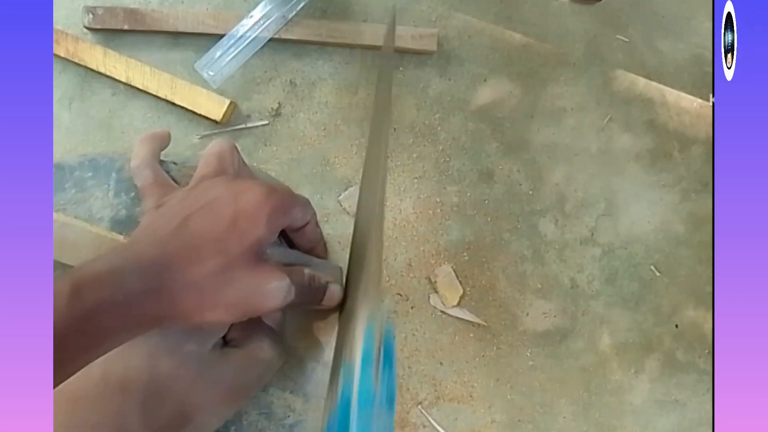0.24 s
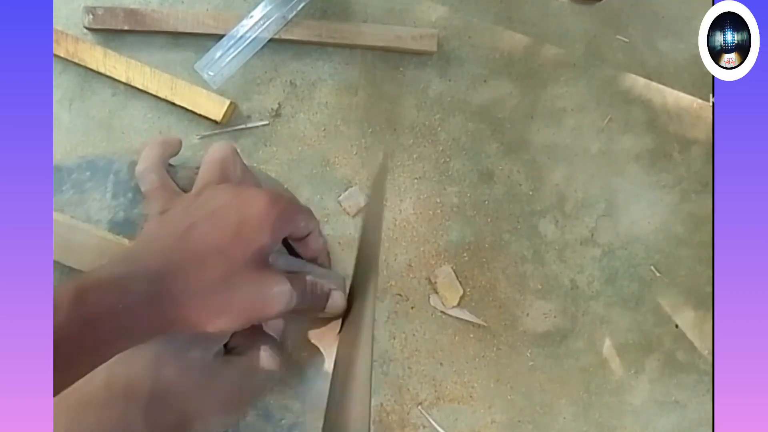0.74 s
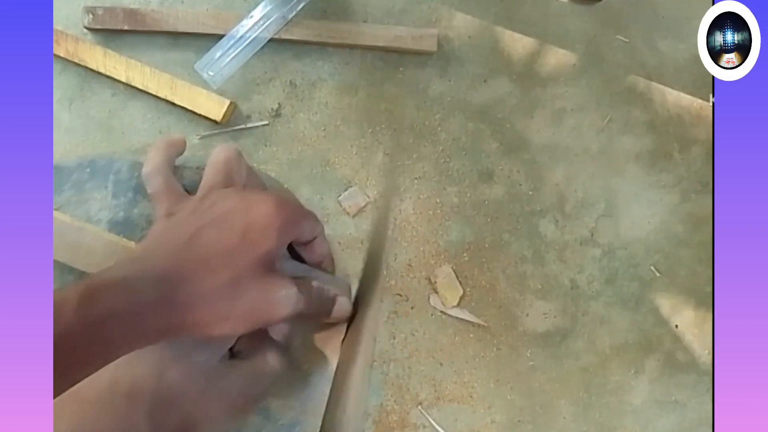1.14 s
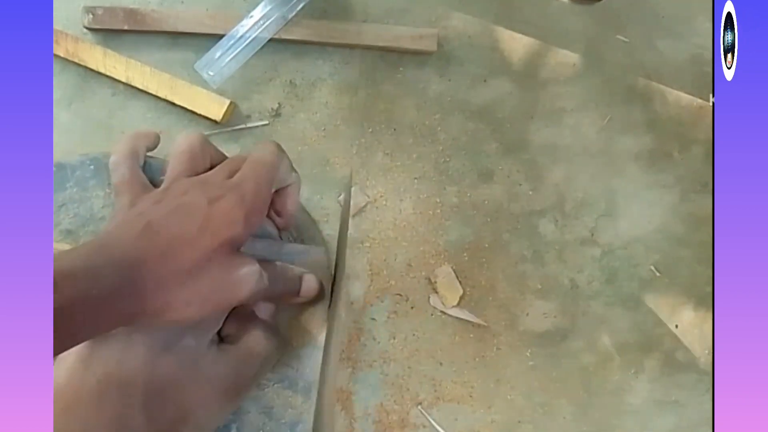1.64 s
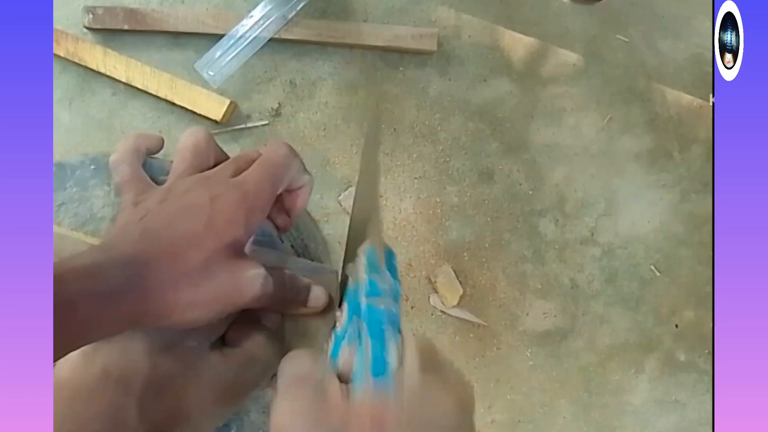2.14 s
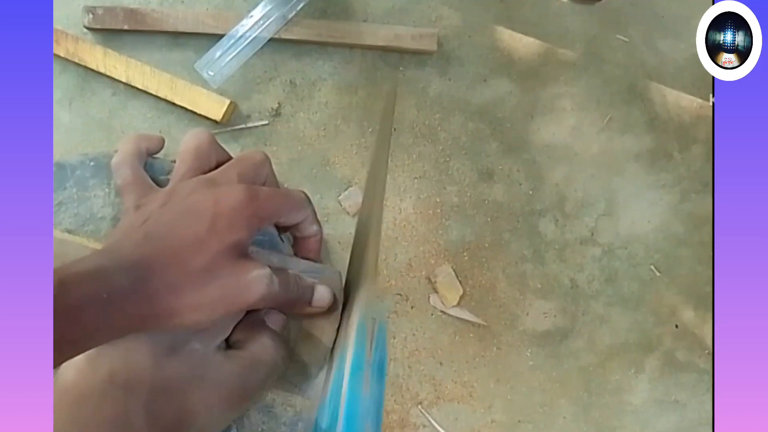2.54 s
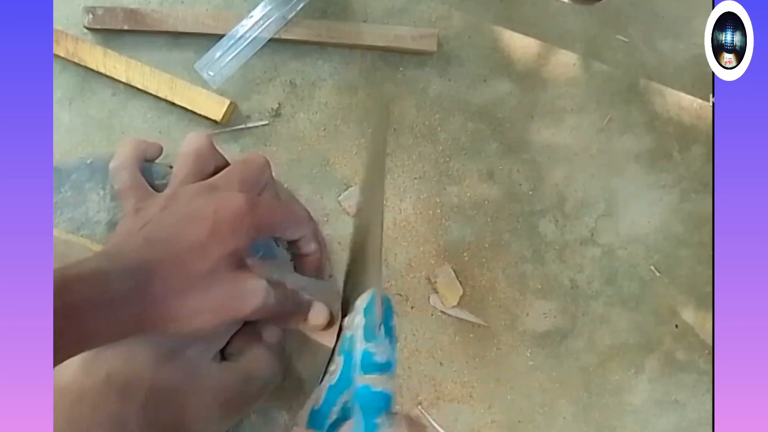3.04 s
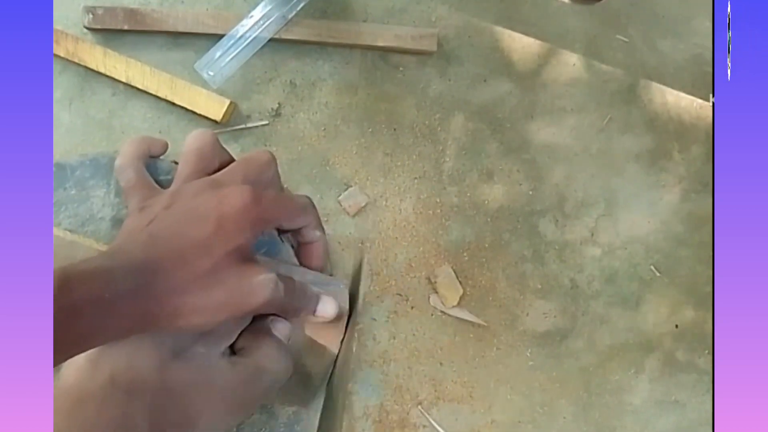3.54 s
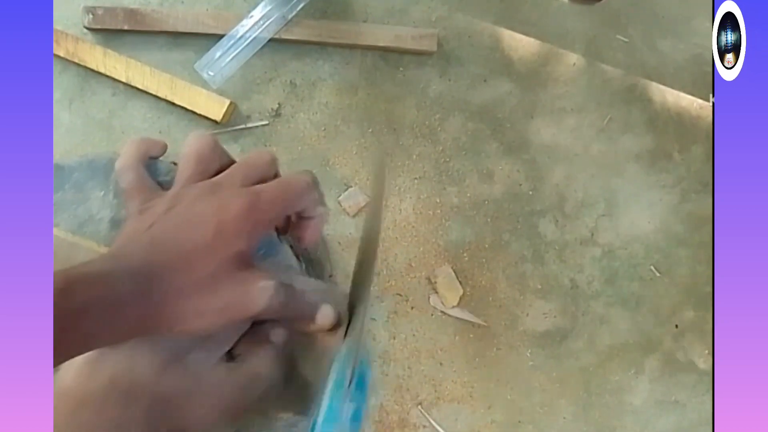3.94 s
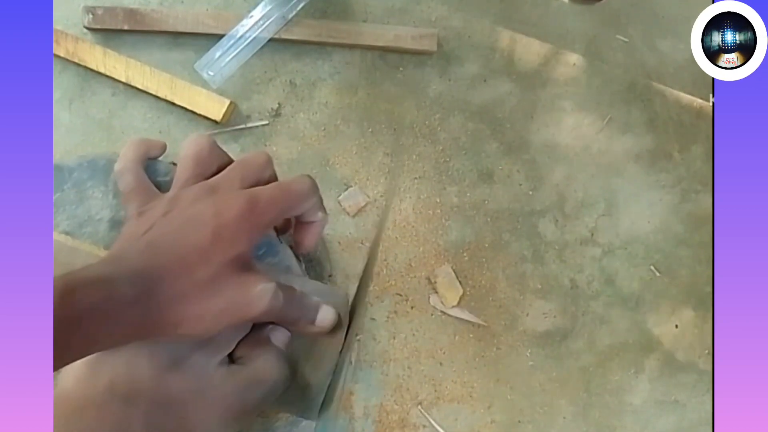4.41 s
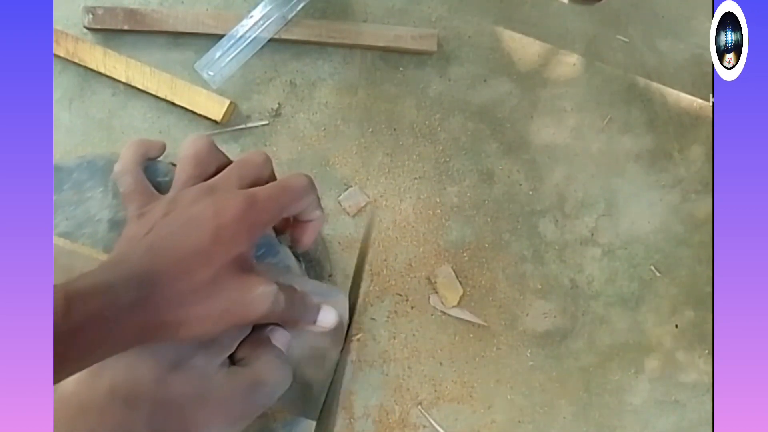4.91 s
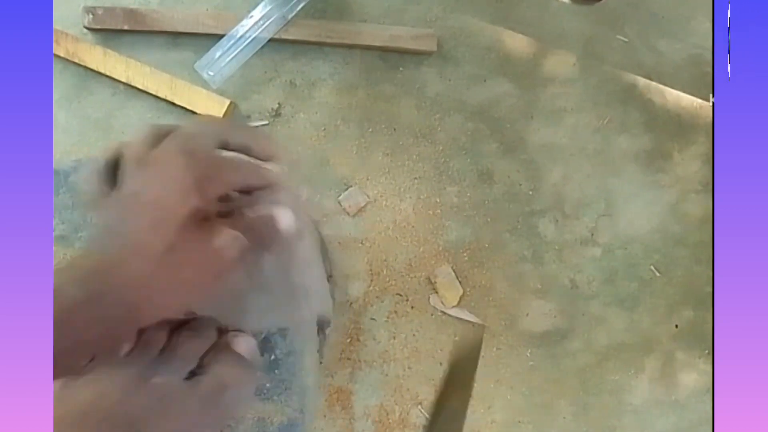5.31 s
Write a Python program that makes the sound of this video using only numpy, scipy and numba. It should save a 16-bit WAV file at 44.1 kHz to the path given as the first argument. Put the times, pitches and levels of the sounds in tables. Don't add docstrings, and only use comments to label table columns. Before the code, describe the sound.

Fast, dry sawing of light wood: short gritty rasps with a nasal metallic ring and bright dusty hiss, about five push-pull cycles each second. There is one short gap near the start, then a long run. Small hollow thuds come from the slat against the floor. At the end the loose blade rustles and tinkles faintly, followed by a soft bump, heard close on a phone with pumping background noise.

```python
import sys
import numpy as np
from scipy import signal
from scipy.fft import rfft, irfft
from scipy.io import wavfile
from numba import njit

SR = 44100
rng = np.random.default_rng(int(sys.argv[2]) if len(sys.argv) > 2 else 0)


def field_ratio(decibels):
    return 10 ** (np.asarray(decibels, dtype=float) / 20)


def store_pcm(level_fs):
    pcm = np.round(np.clip(level_fs, -1, 1) * 32767).astype(np.int16)
    wavfile.write(sys.argv[1], SR, np.atleast_2d(pcm).T)


N = 245637

# (time [s], level pulling [dB], level pushing [dB], kerf ring pulling [Hz])
BLADE_SHARE = [(0, -20.5, -8, 2770), (1.302, -31, -4.5, 2850), (1.499, -35, -5.5, 2490),
               (2.299, -21, -3.5, 2580), (2.9, -16, -2, 2570), (3.1, -15, -11.5, 2600),
               (4.1, -10, -15, 2620), (4.4, -33, -3, 2800), (4.75, -16, -16.5, 2680)]


def unit(x):
    return x / np.sqrt(np.mean(x ** 2) + 1e-20)


def curve(s, values):
    return np.interp(np.arange(N) / SR, s, values)


def wander(hz):
    r = np.exp(-2 * np.pi * hz / SR)
    noise = rng.standard_normal(N + 4000)
    return unit(signal.lfilter([1], [1, -2 * r, r * r], noise)[4000:])


def coloured(x, points):
    hz, db = np.transpose(points)
    grid = np.maximum(np.fft.rfftfreq(N, 1 / SR), 1)
    gain = field_ratio(np.interp(np.log(grid), np.log(hz), db))
    return unit(irfft(rfft(x) * gain, N))


def highpass(x, hz):
    return signal.sosfilt(signal.butter(4, hz, "high", fs=SR, output="sos"), x)


@njit
def resonate(x, cos_w, r):
    y = np.zeros(len(x))
    for i in range(2, len(x)):
        drive = (1 - r * r) / 2 * (x[i] - x[i - 2])
        y[i] = drive + 2 * r * cos_w[i] * y[i - 1] - r * r * y[i - 2]
    return y


def peak(x, hz, width_hz):
    return resonate(x, np.cos(2 * np.pi * hz / SR) + np.zeros(N), np.exp(-np.pi * width_hz / SR))


def body(x, modes, patchy_db, patch_hz, bend=1):
    feeds = [field_ratio(db + patchy_db * wander(patch_hz)) for hz, width, db in modes]
    power = sum(feed ** 2 * width * np.pi / SR for feed, (hz, width, db) in zip(feeds, modes))
    total = np.sqrt(power)
    out = np.zeros(N)
    for k, (hz, width, db) in enumerate(modes):
        out += (-1) ** k * peak(feeds[k] / total * x, hz * bend, width)
    return out


def struck(rows, rise_s):
    out = np.zeros(N)
    for s, db, hz, t60 in rows:
        start = int(s * SR)
        t = np.arange(min(int(t60 * SR), N - start)) / SR
        onset = (1 - np.exp(-t / rise_s)) ** 2
        out[start:][:len(t)] += field_ratio(db - 60 * t / t60) * onset * np.sin(2 * np.pi * hz * t)
    return out


def strokes():
    # (start [s], length [s], level [dB], growth over the stroke [dB], run-up [s])
    pull_rows = [(0.005, 0.064, -34.5, -5, 0.006), (0.194, 0.059, -31.5, -4, 0.015),
                 (0.385, 0.069, -40, 1, 0.012), (0.594, 0.069, -35, 4, 0.017),
                 (0.8, 0.061, -34, 5.6, 0.011), (1.272, 0.049, -28.5, 0.5, 0.029),
                 (1.463, 0.061, -35.5, 2.5, 0.0087), (1.669, 0.088, -42, -1.5, 0.022),
                 (1.885, 0.075, -32, 9.5, 0.014), (2.093, 0.078, -39.5, 1.2, 0.017),
                 (2.312, 0.086, -40, 0, 0.0055), (2.532, 0.096, -32, 1.5, 0.006),
                 (2.751, 0.075, -39, 3, 0.0034), (2.965, 0.075, -39.5, 4, 0.003),
                 (3.185, 0.07, -32.5, 3.5, 0.033), (3.397, 0.078, -40.5, -0.5, 0.007),
                 (3.621, 0.089, -33, 4, 0.0022), (3.851, 0.095, -39, -4, 0.003),
                 (4.08, 0.08, -42, -2.5, 0.0019), (4.277, 0.074, -41, 8.5, 0.016),
                 (4.499, 0.062, -34.5, -1.3, 0.031), (4.684, 0.051, -35, -8.5, 0.027)]
    # (start [s], length [s], level [dB], growth over the stroke [dB], kerf ring [Hz])
    push_rows = [(0.09, 0.058, -26.5, 2, 2800), (0.282, 0.052, -27, -3, 2810),
                 (0.493, 0.045, -28.5, -3.7, 2850.0), (0.687, 0.054, -24.5, 7.5, 2900),
                 (0.9, 0.053, -27.5, 0.5, 2780), (1.351, 0.053, -24.5, 0.3, 2890),
                 (1.559, 0.059, -27.5, -1.8, 2845), (1.789, 0.048, -28.5, 0, 2840),
                 (1.986, 0.058, -26, 0.5, 2880), (2.199, 0.053, -27.5, 3.5, 2940),
                 (2.423, 0.046, -26.5, 1.8, 2830), (2.637, 0.054, -28, -1, 2875),
                 (2.855, 0.053, -30.0, -1, 2840), (3.067, 0.058, -30, 7, 2830),
                 (3.277, 0.062, -27, 0, 2850), (3.512, 0.049, -26, 0.1, 2820), (3.732, 0.056, -26, 0, 2860),
                 (3.962, 0.053, -29, -3.5, 2830), (4.188, 0.049, -29, -0.5, 2780),
                 (4.381, 0.055, -33.5, 5.2, 2770), (4.586, 0.057, -29, -1.5, 2780.0)]
    push_run_up_s = .012
    at, ring_hz = np.transpose(BLADE_SHARE)[[0, -1]]
    rows = [(*row, push_run_up_s, 1) for row in push_rows]
    for s, length, db, growth, run_up in pull_rows:
        rows.append((s, length, db, growth, np.interp(s, at, ring_hz), run_up, 0))
    return np.transpose(sorted(rows))


def along_strokes(early, late):
    start, length = strokes()[:2]
    times = np.ravel([start + .2 * length, start + .8 * length], order="F")
    return curve(times, np.ravel([early, late], order="F"))


def drive(force, db, rise_db):
    return force * field_ratio(along_strokes(db - rise_db, db + rise_db))


def effort(linger=(0, 0)):
    # (from [s], to [s])
    contacts = [
        (0, .985),
        (1.228, 4.76),
    ]
    contact_db, cut_db = -64, 2.5
    run_up_db, arch_db = (-29, -23), (0, 1)
    bite_s, bite_db = (0.0045, 0.0081), (-5.5, -3)
    brake_s, brake_db = .005, -7
    stop_s, stop_db = (.014, .013), (-24, -27)
    force = field_ratio(contact_db) * sum(curve([a - .006, a, b, b + 0.0091], [0, 1, 1, 0]) for a, b in contacts)
    for s, length, db, growth, hz, run_up, kind in strokes().T:
        k, early, late = int(kind), -.6 * growth, .6 * growth
        end = s + length + linger[k]
        points = [(s - run_up - .012, -60),
                  (s - run_up, early + run_up_db[k]),
                  (s, early + bite_db[k]),
                  (s + bite_s[k], early - arch_db[k]),
                  (s + length / 2, arch_db[k]),
                  (end - brake_s, late - arch_db[k]),
                  (end, late + brake_db),
                  (end + stop_s[k], late + stop_db[k]),
                  (end + stop_s[k] + .02, -60)]
        times, shape = np.transpose(points)
        i = np.arange(max(0, int(times[0] * SR)), int(times[-1] * SR))
        force[i] += field_ratio(db + cut_db + np.interp(i / SR, times, shape))
    return force


def teeth(per_s, spread_db, burst_db):
    sizes = field_ratio(spread_db * np.minimum(rng.exponential(1, N), 4)) * rng.choice([-1, 1], N)
    return sizes * (rng.random(N) < per_s / SR) * field_ratio(burst_db * wander(330))


def hard_bites():
    # (time [s], peak level [dB])
    catches = [(0.12, -27.5), (0.2278, -32.5), (0.3139, 0), (0.7309, -18.5), (1.27, -3.5), (1.3569, -31.5),
               (2.0011, 2), (2.2118, -1.5), (2.65, -10.5), (3.069, -4.5), (3.0841, -3.5), (3.0938, 5),
               (3.2775, -1.5), (3.6916, 0), (3.7503, -2.5), (3.9673, -14.5), (3.9873, -21)]
    bites = unit(teeth(10000, 1.4, 2.6))
    for at, db in catches:
        bites[int((at - .001) * SR):][:90] *= field_ratio(.5 * (db + 12.5) + 4.5)
    return bites


def kerf_centre():
    hz, run_up, push = strokes()[4:]
    sweep = np.take((40, 300), push.astype(int)) / 2   # Hz, pull and push
    return 2755 + 1.25 * (along_strokes(hz - sweep, hz + sweep) - 2800)


def kerf_ring(force, bites, fine, centre_hz):
    kerf_modes = [2186, 2253, 2576, 2656, 2850, 3056, 3151, 3260, 3654]
    grip_hz = np.take((380, 310), strokes()[-1].astype(int))
    spread_hz = along_strokes(grip_hz, grip_hz)
    near_centre = [(hz, 170, -3.0 * ((hz - centre_hz) / spread_hz) ** 2) for hz in kerf_modes]
    clicks = unit(bites + .5 * fine)
    kerf = body(force * field_ratio(4.5) * clicks, near_centre, 2.11, 30, 1 + 0.021 * wander(28))
    return highpass(kerf, 2150)


def blade_ring(force, bites, fine, centre_hz):
    # (frequency [Hz], width [Hz], level [dB])
    blade_modes = [(3570, 150, 4.5), (3992, 64, 9), (4172, 36, 3.5), (4900, 240, -4.5), (4960, 72, 0),
                   (5220, 200, -15.5), (5690, 340, -24.5), (6680, 210, -12), (7383, 300, -18)]
    start, push = strokes()[[0, -1]]
    at, pulling, pushing = np.transpose(BLADE_SHARE)[:3]
    level_db = np.where(push, np.interp(start, at, pushing), np.interp(start, at, pulling))
    clicks = unit(bites + 0.5 * fine)
    flex = (centre_hz / 2900) ** .15
    blade = body(drive(force, level_db - 2.0, 0.89) * clicks, blade_modes, 1.7, 11, flex)
    return blade + peak(drive(force, level_db - 10.5, 2.5) * fine, 4970, 1300)


def dust_hiss(lingering, bites, fine):
    # (frequency [Hz], level [dB per Hz])
    dust_spectrum = [(1500, -34.5), (3000, 7.5), (6000, 0.5), (9000, -6.5), (12500, -14), (15500, -4.5)]
    # (frequency [Hz], width [Hz], level [dB])
    shimmer_modes = [(6800, 690, -9), (8740, 290, -2.5), (10200, 2200, -4), (12340, 2000, 4.5),
                     (12570, 1900, 12.5), (14200, 1700, -2)]
    start, length, db, growth, hz, run_up, push = strokes()
    kind = push.astype(int)
    level_db = np.take((-22, -23.5), kind) - 0.15 * (db + 25) + np.take((1.87, 2.24), kind) * start
    rise_db = np.take((0.5, 4), kind)
    shimmer = body(drive(lingering, level_db - 5.0, rise_db) * fine, shimmer_modes, 7.0, 9)
    dust = drive(lingering, level_db + 0.23, rise_db) * field_ratio(0.5 * wander(15))
    return shimmer + dust * coloured(fine + 0.11 * bites, dust_spectrum)


def slat_ring(force, lingering, bites, fine):
    # (frequency [Hz], width [Hz], level [dB])
    slat_modes = [(299, 51, 0.5), (447, 110, -12), (727, 140, -4), (842, 290, -6.5), (1274, 167, -6),
                  (1600, 65, 0.5), (2100, 300, 1)]
    # (start [s], length [s], level [dB])
    judders = [
        (2.593, 0.03, 7),
        (3.113, 0.044, -2.5),
        (3.298, .03, 3),
        (3.697, 0.028, 11),
        (4.236, 0.027, 0.5),
    ]
    level_db = -20 - .5 * (strokes()[2] + 25)
    slat = body(drive(force, level_db + 1.78, 0.33) * unit(bites + 0.68 * fine), slat_modes, 3.8, 22)
    slat += peak(drive(lingering, level_db + 2.5, .4) * fine, 1000, 1100)
    judder_db = sum(curve([s, s + .004, s + length - .008, s + length], [0, db, db, 0])
                    for s, length, db in judders)
    return slat * field_ratio(judder_db)


def saw():
    force = effort()
    lingering = effort((.009, 0))
    bites, fine = hard_bites(), unit(teeth(14000, 2.0, 1.3))
    centre_hz = kerf_centre()
    steel = kerf_ring(force, bites, fine, centre_hz) + blade_ring(force, bites, fine, centre_hz)
    steel += dust_hiss(lingering, bites, fine)
    return steel, slat_ring(force, lingering, bites, fine)


def knocks():
    # (time [s], peak level [dB], level of the lift [dB])
    turns = [(0.395, -34.5, -41), (0.596, -34.5, -42.5), (0.807, -29.5, -36), (1.446, -39.5, -60),
             (1.675, -36.5, -45), (1.897, -30.5, -41), (2.32, -35.5, -45), (2.537, -34.5, -45.5),
             (2.755, -39.5, -58), (2.974, -37.5, -57.5), (3.403, -43, -58), (3.63, -32, -42),
             (3.856, -32, -43), (4.083, -43.5, -50), (4.293, -37, -47), (4.497, -37.5, -54.5)]
    # (time [s], peak level [dB], frequency [Hz])
    bumps = [
        (0.095, -33.5, 312),
        (3.693, -40, 325),
        (5.007, -55.5, 302),
        (5.424, -47.5, 244),
    ]
    # (time [s], peak level [dB], frequency [Hz])
    taps = [(2.1, -47, 3300), (4.87, -43, 680), (4.895, -56, 217), (4.925, -63, 940), (7.9, -57, 230),
            (5.004, -60, 2990), (5.02, -62, 3100), (5.035, -54, 270), (5.082, -67, 110), (5.104, -63, 110),
            (5.464, -56, 1640), (5.463, -59, 2500), (5.463, -63, 800), (6.9, -46.5, 115)]
    rows = list(bumps)
    for s, db, lift_db in turns:
        rows += [(s, db, 272.4), (s - .027, lift_db, 277)]
    dull = struck([(s - .003, db + 12, hz, .038) for s, db, hz in rows], .0028)
    return dull + struck([(s, db + 6, hz, 7.0 / hz) for s, db, hz in taps], .0004)


def tinkle(sharpness=70):
    # (start [s], length [s], level [dB])
    rubs = [
        (1.034, 0.071, -84.5),
        (1.162, 0.044, -92),
        (4.76, 0.11, -95.5),
        (4.959, 0.076, -68.5),
        (5.043, 0.045, -77),
        (5.117, .075, -82),
        (5.22, 0.055, -82),
        (5.418, 0.076, -93),
        (5.562, 0.028, -68),
    ]
    # (time [s], peak level [dB])
    touches = [
        (4.965, -56),
        (4.98, -55),
        (5.007, -55.5),
        (5.022, -56),
        (5.034, -72.5),
        (5.08, -76.5),
        (5.165, -72.5),
        (5.25, -72),
        (5.43, -80.5),
        (5.477, -71.5),
    ]
    # (frequency [Hz], level [dB])
    loose_modes = [(930, -5), (1620, 1), (2490, -2), (2850, -3), (3350, 2), (4500, -13), (6450, -12),
                   (9300, -15), (14300, -17)]
    # (time [s], pitch factor [1])
    bends = [
        (1.2, .97),
        (4.7, 1.07),
        (5.11, 1.065),
        (5.118, 1.0),
        (5.21, .995),
        (5.218, .945),
        (5.4, .94),
    ]
    rise_s, fall_s = 0.01, 0.018
    rub = np.zeros(N)
    for s, length, db in rubs:
        times = [s, s + rise_s, s + length - fall_s, s + length + fall_s]
        rub += field_ratio(db) * curve(times, [0.0035, 0.37, 0.96, 0.0086])
    contact = rub * unit(teeth(9000, 0.82, 1.5))
    modes = [(hz, hz / sharpness, db) for hz, db in loose_modes]
    sing = body(contact, modes, 2.5, 12, curve(*np.transpose(bends)))
    for s, db in touches:
        contact[int(s * SR)] += field_ratio(db + 23.5)
    return field_ratio(-12.5) * peak(contact, 4000, 6000) + field_ratio(5) * sing


def porch(x, wet_db, t60, dull):
    t = np.arange(int(.35 * SR)) / SR
    noise = signal.lfilter([1], [1, -dull], rng.standard_normal(len(t)))
    tail = noise * field_ratio(-60 * t / t60) * (t > .004)
    return field_ratio(wet_db) * signal.fftconvolve(x, tail / np.sqrt(np.sum(tail ** 2)))[:N]


def scene():
    steel, wood = saw()
    wood = wood + knocks()
    near = steel + wood + tinkle()
    bright = highpass(steel, 4500)
    scatter = porch(near, -24, .04, .3)
    tail = porch(steel, -39, .2, 0) + porch(bright, -25, .22, 0) + porch(wood, -21, .28, .9)
    return (near + scatter + tail)[None]


def pumping():
    # (time [s], level before [dB], level after [dB])
    snaps = [
        (.1, 14.5, 10),
        (.69, 12.5, 5),
        (1.33, 15.5, 9),
        (1.97, 13, 0),
        (2.62, 12, 1.5),
        (3.26, 9, 1),
        (3.71, 11, 2.5),
        (4.58, 11, 2.5),
    ]
    creep_s, snap_s, settled_db = .12, 0.035, 1
    open_s, open_db = 4.964, 11.5
    points = []
    for s, before, after in snaps:
        points += [(s - creep_s, settled_db), (s, before), (s + snap_s, after)]
    points += [(open_s, settled_db), (open_s + 0.00011, open_db)]
    return curve(*np.transpose(points))


def rumble():
    # (frequency [Hz], level [dB per Hz])
    rumble_spectrum = [(20, -6.5), (60, -6.5), (120, -8.5), (250, -17.5), (400, -31), (800, -57.5)]
    return field_ratio(-75.5 + 1.2 * wander(11)) * coloured(rng.standard_normal(N), rumble_spectrum)


def hiss():
    # (frequency [Hz], level [dB per Hz])
    hiss_spectrum = [(300, 6), (900, 2), (2500, 3.5), (5000, -17.5), (15000, -11.5)]
    return field_ratio(-89.5 + 2.5 * wander(12)) * coloured(rng.standard_normal(N), hiss_spectrum)


def low_pass(x):
    return signal.sosfilt(signal.butter(12, 15710, fs=SR, output="sos"), x)


def record(dry):
    offset, cutoff_hz = 0.0018, 15640
    gain = field_ratio(pumping())
    x = dry + np.sqrt(gain) * hiss() + gain * (rumble() + offset)
    x = signal.sosfilt(signal.ellip(12, .5, 70, cutoff_hz, fs=SR, output="sos"), x)
    return low_pass(x)


dry = scene()
out = record(dry)
store_pcm(out)
```